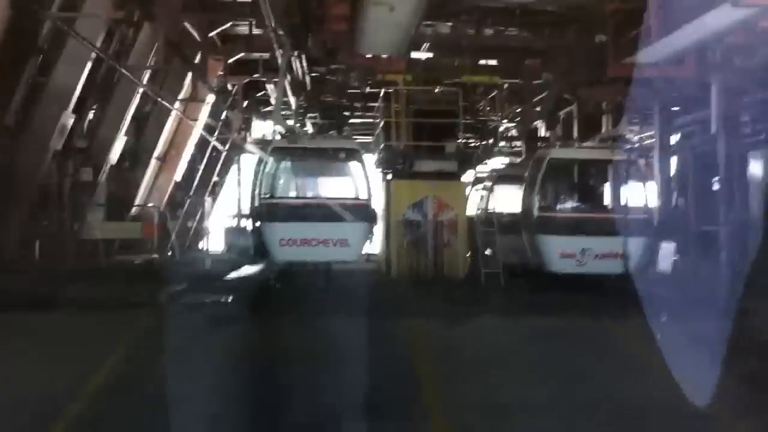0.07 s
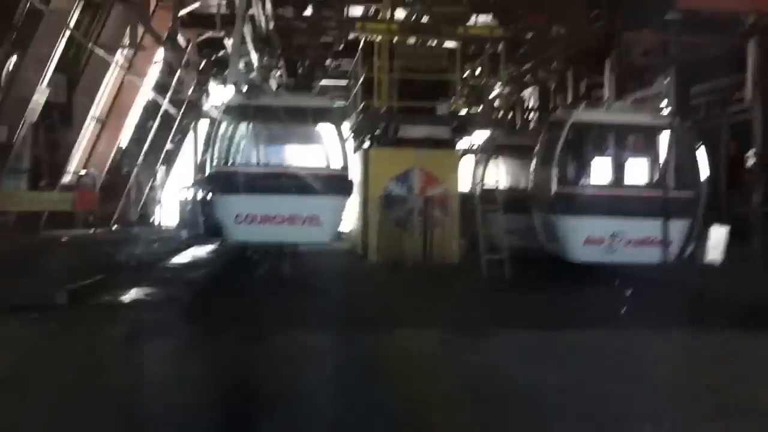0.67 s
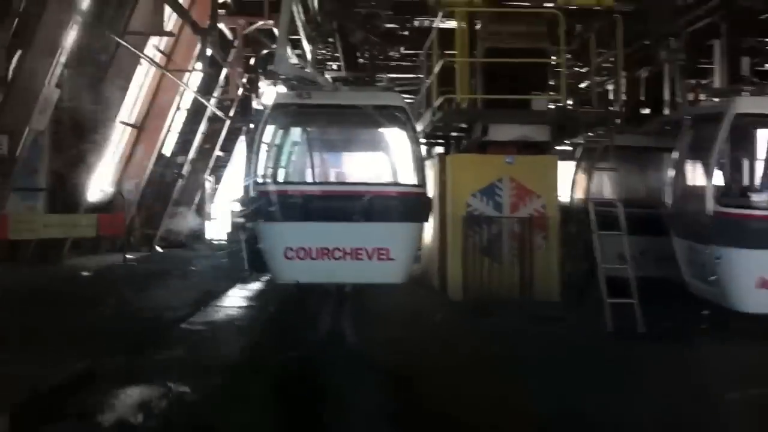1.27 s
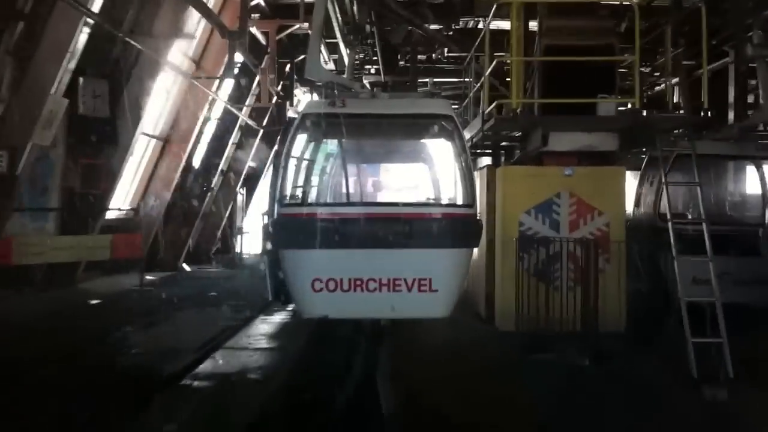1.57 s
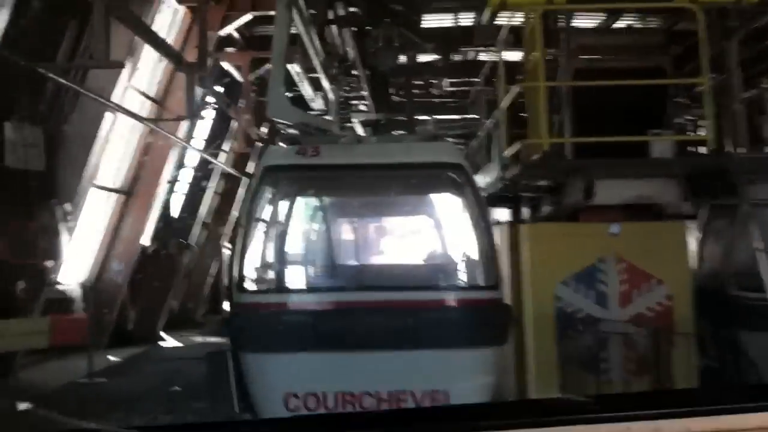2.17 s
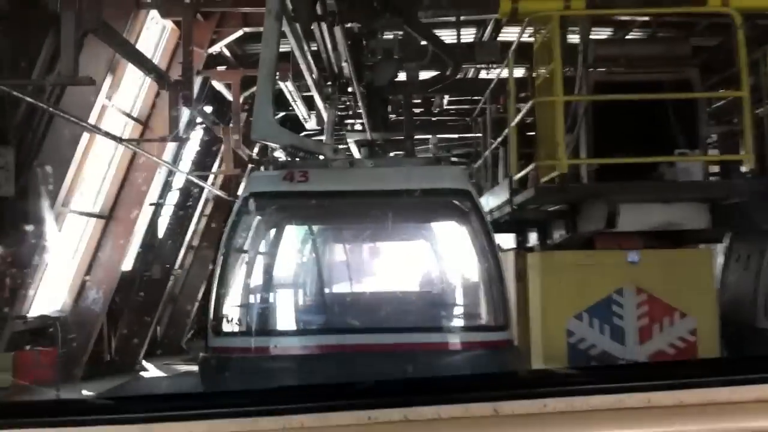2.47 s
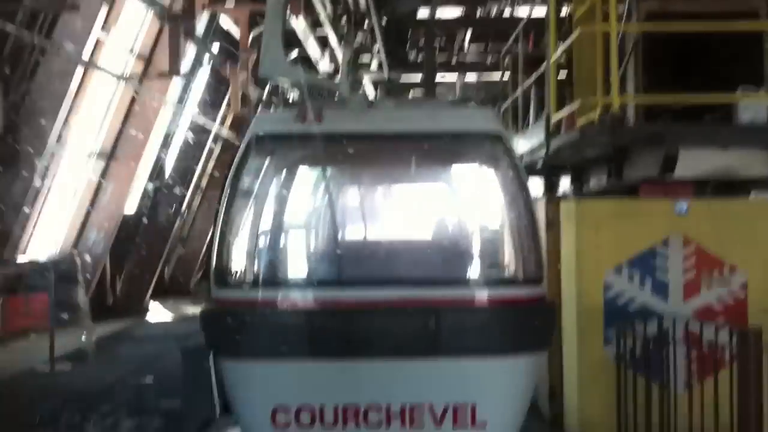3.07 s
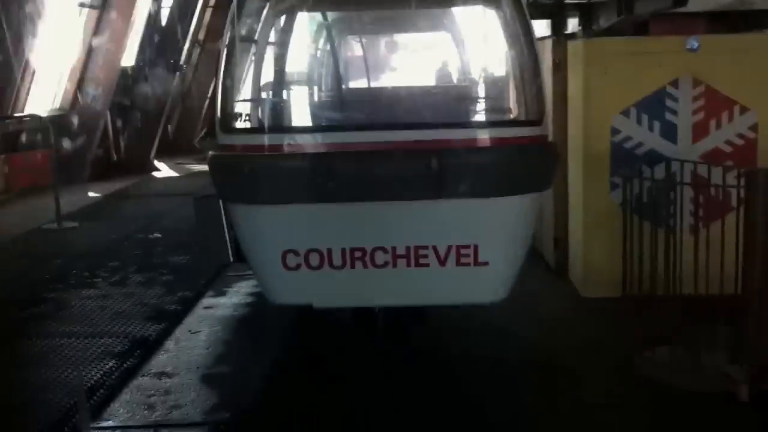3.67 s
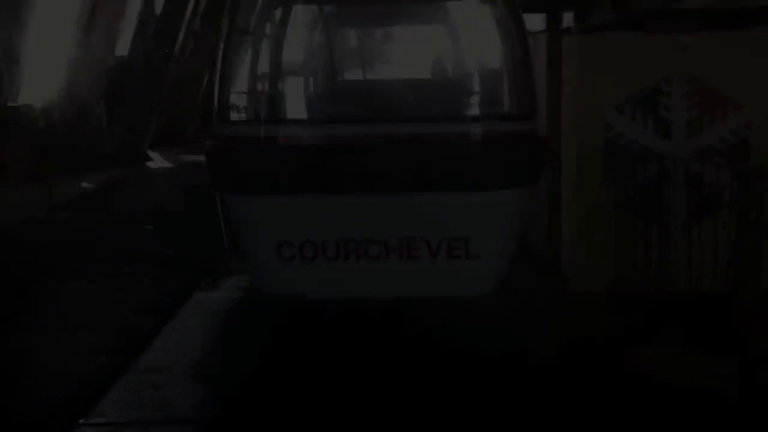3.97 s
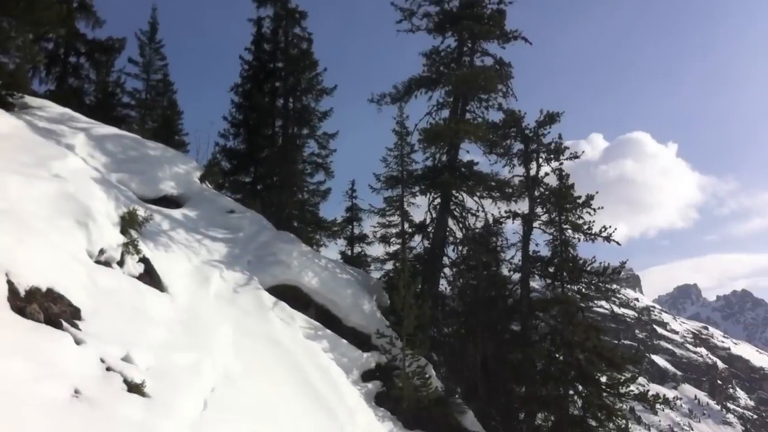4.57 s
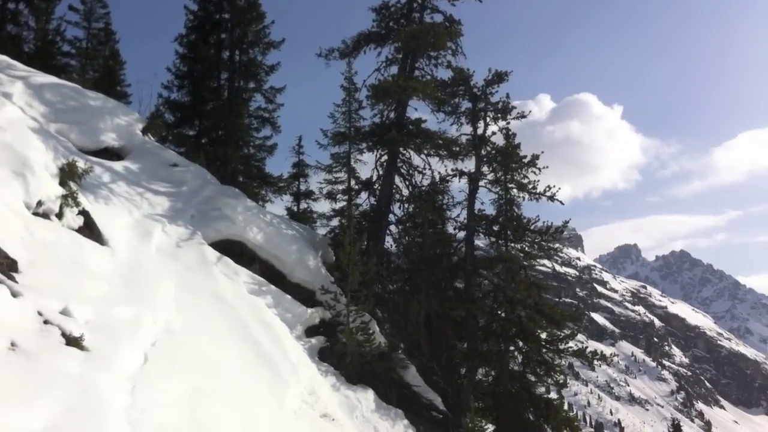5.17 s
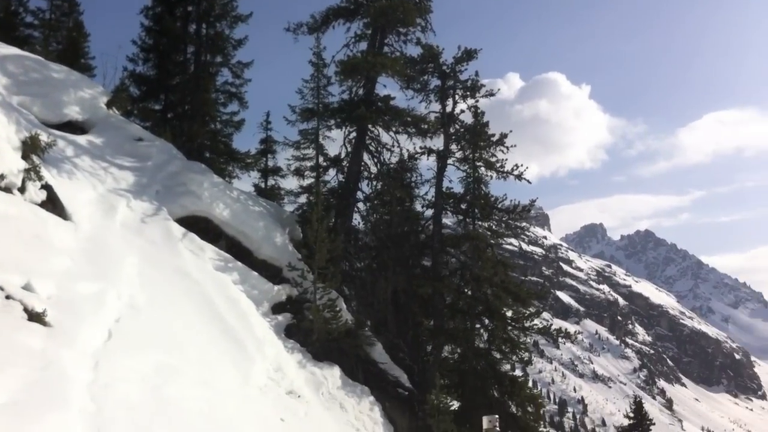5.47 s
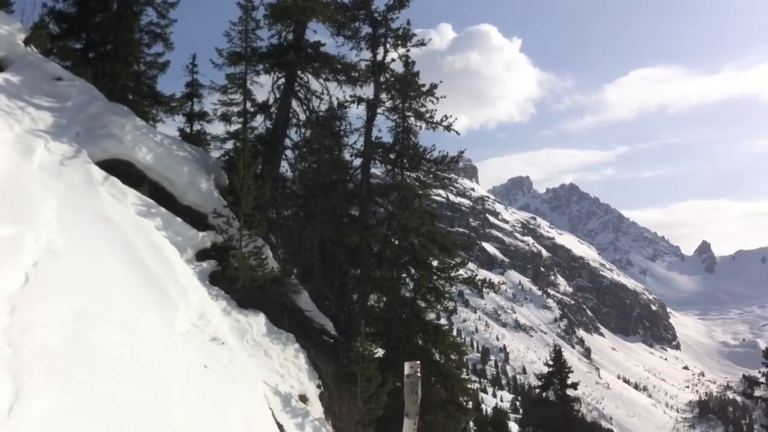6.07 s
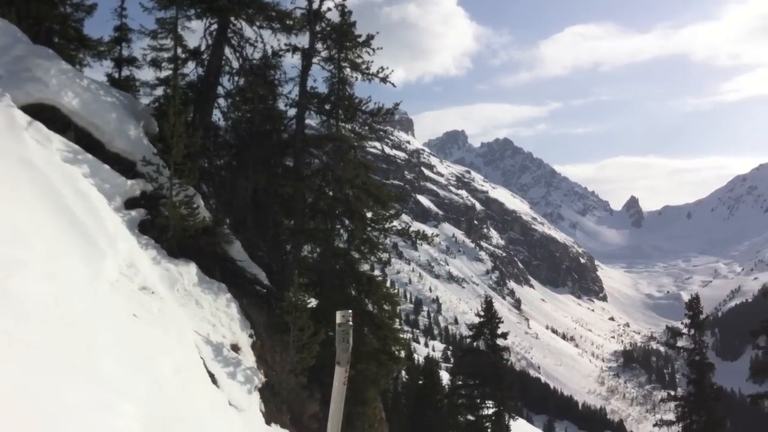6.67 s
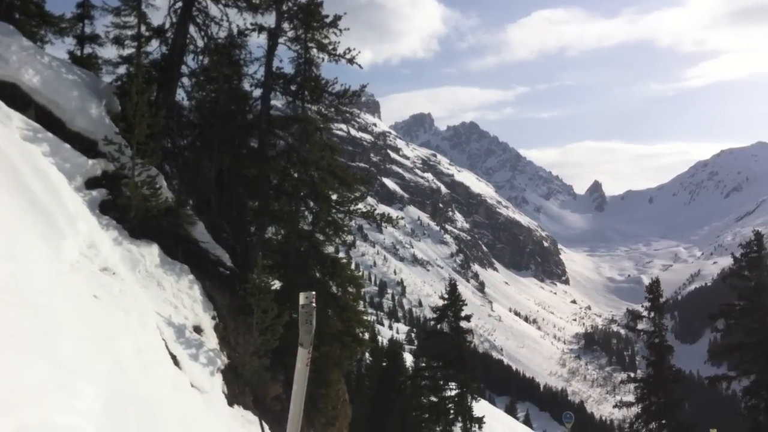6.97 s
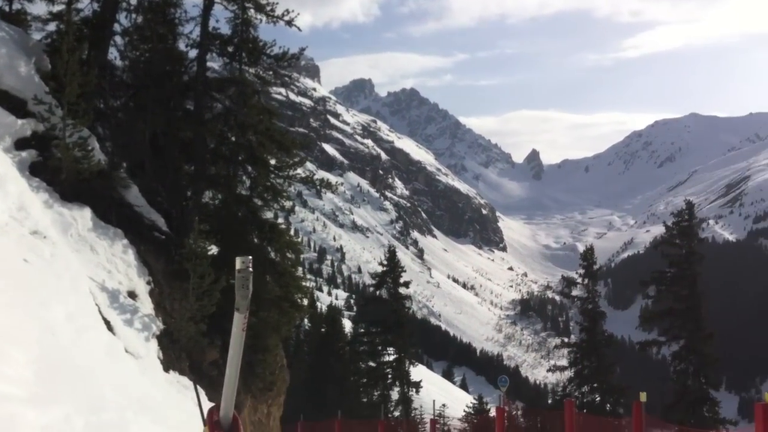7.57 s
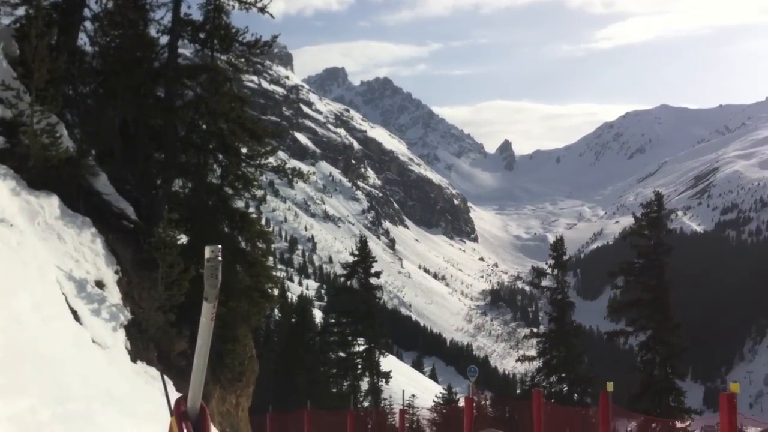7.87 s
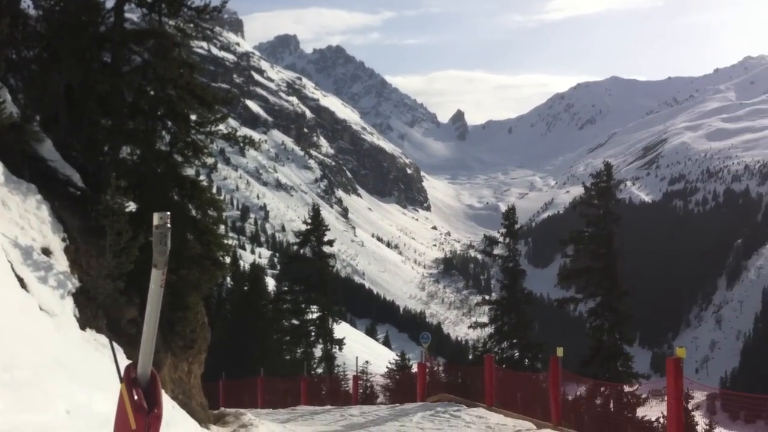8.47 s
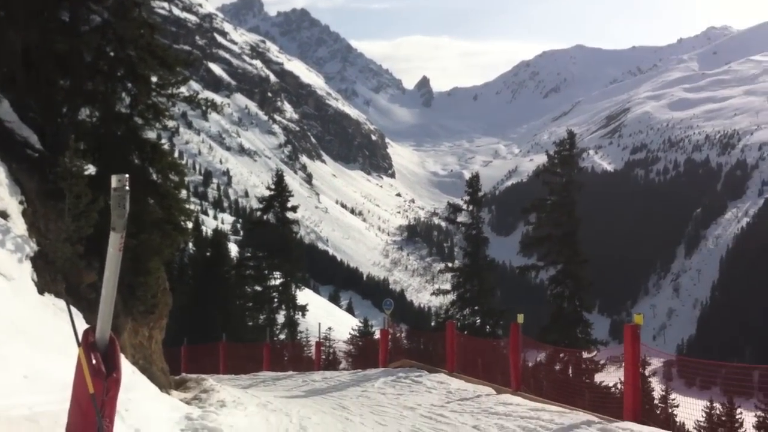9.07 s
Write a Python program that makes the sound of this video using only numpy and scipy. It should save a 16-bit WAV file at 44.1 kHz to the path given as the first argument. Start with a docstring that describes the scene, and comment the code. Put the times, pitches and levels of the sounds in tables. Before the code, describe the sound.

Cable car cabins roll through a station hall with a deep rumble, booming tyre bumps, rattles and ringing steel clanks over a machine hum. The sound cuts out briefly near the start and pops back in. The rolling eases, a few lighter clanks and scrapes follow, and the station fades away. A much quieter snowy slope fades in, where two small birds whistle and dry ticks snap close by over soft wind and a distant lift hum.

```python
"""Booms and steel clanks fill a gondola station as cabins roll along the rail: tyres bump, the steel
rings, loose parts rattle and the drive hums underneath. Near the start the sound cuts out briefly
and pops back in. The station then fades away and a quiet snowy slope fades in: two small birds
whistle slurred notes, and dry ticks snap close by, over soft wind and the far hum of the lift."""
import sys
import numpy as np
from scipy import signal
from scipy.fft import rfft, irfft
from scipy.io import wavfile
from scipy.ndimage import uniform_filter1d

SR = 44100
rng = np.random.default_rng(int(sys.argv[2]) if len(sys.argv) > 2 else 0)


def log_audio(samples):
    """Write samples as a 16-bit WAV file to the path given in sys.argv[1]."""
    # one column per channel
    frames = np.atleast_2d(samples).T
    # limit to full scale, then quantise
    limited = np.clip(frames, -1, 1)
    pcm = np.round(limited * 32767).astype(np.int16)
    wavfile.write(sys.argv[1], SR, pcm)


N = 410571
TIME, BINS = np.arange(N) / SR, np.fft.rfftfreq(8192, 1 / SR)
OCTAVES = np.log2(np.clip(BINS, 200, 9000) / 1000)  # tilts the tone around 1 kHz


# How hard the wheels roll, driving rumble and rattle. Each row: time in seconds, level in dB.
ROLL_LEVEL = [(0, -27), (.04, -18.5), (.32, -27), (.57, -19), (.78, -27.5), (.88, -20.5), (1.15, -20),
              (1.42, -37), (2.0, -46), (2.9, -42), (3.05, -30), (3.7, -37), (3.85, -46)]
# Tone of the rumble. Each row: frequency in Hz, relative level in dB.
RUMBLE_EQ = [(25, -36.5), (55, -20), (100, -11.5), (160, -2.5), (260, -5.5), (420, -8), (600, -22),
             (1500, -48.5), (6000, -84.5)]
# Resonances of the hall and its frame. Each row: frequency in Hz, width in Hz, boost in dB.
FRAME_MODES = [(73, 12, 8.5), (132, 22, 6), (148, 16, 3), (204, 11, 12.5), (244, 16, 9), (299, 14, 3.5),
               (330, 22, 8.5), (378, 16, 2.5), (416, 16, 4)]
# The hardest wheel bumps. Each row: start in seconds, relative level in dB.
WHEEL_BUMPS = [(.505, -18), (.716, -20), (.886, -10.5), (1.096, -17), (1.237, -14.5), (1.339, -13),
               (1.382, -15), (1.485, -16), (1.672, -19), (1.772, -22), (2.205, -26.5), (2.598, -23.5),
               (2.668, -27.5), (3.217, -26), (3.438, -26)]
# What a bump rings. Each row: pitch in Hz, relative level in dB, seconds to fall 60 dB.
BOOM_MODES = [(205.4, 1.5, 0.2), (242, -3, 0.17), (131, -17.5, 0.045)]
# Dull thuds of swaying cabins. Each row: start in seconds, level in dB, pitch in Hz.
CABIN_THUDS = [(.023, -14, 172), (.386, -19, 136.5), (.852, -10.5, 143), (2.2, -20, 124), (3.085, -20, 118)]

def wheels(rumble_db=-3.0, bump_db=2, contact_s=.011, thud_t60=0.18):
    """Rolling wheels shake the frame; each bump of a soft tyre swells into a boom, and cabins thud."""
    out = noise(eq(RUMBLE_EQ) + boosts(FRAME_MODES)) * amp(curve(ROLL_LEVEL) + rumble_db)
    t = TIME[:SR // 2]
    push = 1 - np.exp(-(t / contact_s) ** 2)
    boom = push * sum(amp(db - 60 * t / t60) * np.sin(2 * np.pi * hz * (t - contact_s))
                      for hz, db, t60 in BOOM_MODES)
    for start, db in WHEEL_BUMPS + judder():
        add(out, start, amp(db + bump_db) * boom)
    for start, db, hz in CABIN_THUDS:
        add(out, start, push * amp(db - 60 * t / thud_t60) * np.sin(2 * np.pi * hz * t))
    return out


def judder(span_s=(.38, 1.9), per_s=21, jitter_s=.008, peak_s=1.5, peak_db=-23):
    """A cabin crosses the row of tyres in light bumps. Each row: start in seconds, level in dB."""
    starts = np.arange(*span_s, 1 / per_s)
    starts += jitter_s * rng.standard_normal(len(starts))
    past_peak = starts - peak_s
    levels = peak_db + np.minimum(7 * past_peak, -19 * past_peak)  # build and fade, dB a second
    return list(zip(starts, levels))


# Steel clanks; the one at .226 s is a dull knock as the sound pops back in. Each row: start in seconds,
# level in dB, attack in seconds, seconds to fall 60 dB, brightness in dB per octave.
STEEL_CLANKS = [(0, -18, .016, .5, -.3), (.064, -16.5, .005, .7, 0), (.226, -24.5, .002, .36, -3.2),
                (.358, -20.5, .026, .28, -1.3), (.459, -23.8, .003, .7, 1.8), (.538, -13.5, .009, .32, -.8),
                (.636, -15.5, .004, .21, 0), (1.002, -20, .006, .55, -.5), (1.113, -17.5, .006, .26, -.2),
                (1.447, -22.5, .009, .27, -2.7), (2.075, -39, .013, .9, 2), (2.594, -33, .004, .6, -.6),
                (2.858, -31.8, .013, .22, -2.3), (3.005, -28, .013, .3, -6), (3.254, -34, .0035, .29, 4.5),
                (3.338, -30, .021, .33, 0), (3.376, -24.5, .022, .25, -2), (3.42, -28, .014, .24, -6),
                (3.675, -34, .01, .3, 0)]
# Tone of struck steel. Each row: frequency in Hz, relative level in dB.
STEEL_EQ = [(40, -25), (130, -8), (300, -2), (550, -3), (1000, -5), (2100, -8), (3100, -14), (4800, -13.5),
            (6500, -21), (10000, -29), (15800, -38.5)]
# Resonances of the rail and grips. Each row: frequency in Hz, width in Hz, boost in dB.
STEEL_MODES = [(330, 30, 4), (462, 30, 6), (545, 30, 3), (615, 36, 7), (891, 22, 11), (1120, 30, 3),
               (1410, 60, 7.5), (1945, 60, 5), (2187, 30, 5), (2489, 26, 9), (3915, 80, 4), (4600, 50, 5),
               (4720, 100, 4), (5090, 60, 5)]

def clanks(grain_db=1.7, hall_db=-17, hall_t60=0.48, hall_tilt_db=-4.0):
    """Each clank is a dense clatter of contacts ringing the steel, with a duller tail from the hall."""
    out, t = np.zeros(N), TIME[:SR]
    steel = eq(STEEL_EQ) + boosts(STEEL_MODES)
    for start, db, rise, t60, bright_db in STEEL_CLANKS:
        contacts, grain, echoes, spot = rng.standard_normal((4, len(t)))
        clatter = unit(contacts * amp(grain_db * unit(uniform_filter1d(grain, size=60))))
        attack, after = np.minimum(t / rise, 1), np.maximum(t - rise, 0)
        # every spot on the rail favours its own mix of modes
        spot_db = 2.3 * unit(uniform_filter1d(spot[:len(BINS)], size=7)) * np.clip(OCTAVES + 3, 0, 1)
        colour = steel + bright_db * OCTAVES + spot_db
        direct = signal.fftconvolve(clatter * attack * amp(-60 * after / t60), ring(colour))
        tail = echoes * attack * amp(hall_db - 60 * after / hall_t60)
        hall = signal.fftconvolve(tail, ring(colour + hall_tilt_db * OCTAVES))
        add(out, start, amp(db) * (direct + hall))
    return out


def rattle(rattle_db=-23.6, hard_roll_db=-20, growth=1.65, tilt_db=-3.0, grain_db=1.8, shake_db=1.0):
    """Hard rolling shakes loose steel into an uneven rattle that grows faster than the rumble."""
    steel = noise(eq(STEEL_EQ) + .7 * boosts(STEEL_MODES) + tilt_db * OCTAVES)
    shaking = amp(grain_db * drift(200) + shake_db * drift(20))
    level_db = rattle_db + growth * (curve(ROLL_LEVEL) - hard_roll_db)
    return unit(steel * shaking) * amp(level_db)


# Tone of the machinery bed. Each row: frequency in Hz, relative level in dB.
MACHINE_EQ = [(15, -62), (25, -32), (70, -19.5), (113, 0.5), (165, -7.5), (241, 2), (269, -9), (324, -4.5),
              (449, -11.5), (637, -9), (834, -13.5), (1980, -18), (3130, -28.5), (4820, -28), (15800, -54)]
# Fader for that bed. Each row: time in seconds, level in dB.
MACHINE_FADER = [(0, -33.5), (1.5, -33), (2.7, -33.5), (3.05, -35.5), (3.7, -34.5)]
# Faders for the drive's hum. Each row: time in seconds, lower tone in dB, upper tone in dB.
HUM_FADERS = [(0, -50, -44), (1.5, -52, -52), (2.0, -43.5, -50), (2.75, -48, -38), (3.35, -49, -47),
              (3.62, -39, -47), (4.1, -38, -50)]

def machinery(hum_hz=(105, 124), waver=.018, throb_db=2.5, flutter_db=1.0):
    """Belts and tyres churn in the hall over the two wavering tones of the drive."""
    churn = noise(eq(MACHINE_EQ) + .12 * boosts(STEEL_MODES))
    out = churn * amp(curve(MACHINE_FADER) + flutter_db * drift(6))
    for column, hz in enumerate(hum_hz, 1):
        cycles = np.cumsum(hz * (1 + waver * drift(15))) / SR
        tone = unit(np.sin(2 * np.pi * cycles) * amp(throb_db * drift(14)))
        out += tone * amp(curve(HUM_FADERS, column))
    return out


# Roller scrapes. Each row: peak time in seconds, level in dB, half-width in seconds, pitch in Hz.
ROLLER_SCRAPES = [(2.15, -50, .035, 4980), (2.7, -50, .04, 4800), (2.955, -50, .01, 5400),
                  (3.365, -42, .035, 6100), (3.976, -42.5, .036, 3900)]

def squeaks(width_hz=380):
    """A dry roller scrapes for a moment through one resonance."""
    out = np.zeros(N)
    for peak_s, db, half_width, hz in ROLLER_SCRAPES:
        resonance = -20 * np.log10(1 + ((BINS - hz) / width_hz) ** 2)
        out += swells([(peak_s, db, half_width)]) * noise(resonance)
    return out


# Note shapes. Each gives: length in seconds, held pitch in Hz, opening sweep in Hz,
# settling time in seconds, end flick in Hz, attack in seconds, sag in dB.
DIP_NOTE = (.174, 4080, 2000, .017, 2100, .03, 0)
FALL_NOTE = (.152, 3360, 2480, .02, -300, .008, -7)
RISE_NOTE = (.102, 4660, -1200, .03, 800, .036, -1)
SLIDE_NOTE = (.134, 3270, 1950, .046, -300, .014, -5)
# Each bird's calls. Each row: start in seconds, level in dB, second note's delay in seconds, note count.
FIRST_CALLS = [(5.053, -65, .262, 2), (5.59, -60.5, .268, 2), (6.146, -60.5, .282, 2),
               (8.293, -65, .254, 2), (8.845, -60.5, .272, 2)]
SECOND_CALLS = [(6.16, -63, .168, 2), (6.51, -59, .18, 2), (6.895, -58.5, .188, 2), (7.28, -59, .188, 1)]

def birds(fall_db=2, slide_db=-2, flutter_db=1.5, echo_db=-12.5, echo_t60=0.79):
    """Two birds whistle couplets, scattered faintly by the trees."""
    song = np.zeros(N)
    wobble = 1 + .005 * drift(250) + .004 * drift(15)
    flutter = amp(flutter_db * drift(70))
    singers = (FIRST_CALLS, DIP_NOTE, FALL_NOTE, fall_db), (SECOND_CALLS, RISE_NOTE, SLIDE_NOTE, slide_db)
    for calls, first, second, second_db in singers:
        for start, db, delay, count in calls:
            add(song, start, whistle(start, db, first, wobble))
            if count > 1:
                add(song, start + delay, whistle(start + delay, db + second_db, second, wobble))
    t = TIME[:SR // 2]
    scatter = rng.standard_normal(len(t)) * amp(-60 * t / echo_t60)
    echo = signal.oaconvolve(song, scatter / np.linalg.norm(scatter))[:N]
    return song * flutter + amp(echo_db) * echo


def whistle(start, db, note, wobble, crest_s=.008, flick_s=.015, release_s=.007, detune=.005):
    """A note sweeps to its held pitch and flicks away; reflections off branches beat against it."""
    length, held_hz, sweep_hz, settle, flick_hz, attack, sag_db = note
    t = np.arange(0, length, 1 / SR)
    sweep = sweep_hz / (1 + abs(t - crest_s) / settle) ** 2
    flick = flick_hz / (1 + (length - t) / flick_s) ** 2
    tuning = wobble[round(start * SR):][:len(t)] + detune * rng.standard_normal()
    cycles = np.cumsum((held_hz + sweep + flick) * tuning) / SR
    envelope = np.minimum(t / attack, 1) * np.minimum((length - t) / release_s, 1)
    tone = envelope * amp(db + sag_db * t / length) * unit(np.sin(2 * np.pi * cycles))
    branches = rng.standard_normal(SR // 10) * np.exp(-TIME[:SR // 10] / .014)
    paths = np.r_[1, .35 * branches / np.linalg.norm(branches)]
    return signal.fftconvolve(tone, paths)


# The loudest ticks. Each row: start in seconds, peak in dB, centre frequency in Hz.
DRY_TICKS = [(5.8039, -34, 9100), (6.3339, -44, 5300), (6.7995, -41, 7800), (6.8285, -33, 4900),
             (7.1514, -39, 5100), (7.2124, -38, 6200), (7.651, -30, 6200), (7.7024, -35, 5800),
             (8.0724, -34, 8700), (8.1641, -37, 5100), (8.4659, -41, 4200), (8.6382, -43, 4000)]
# Soft rustles. Each row: peak time in seconds, level in dB, half-width in seconds.
RUSTLE_SWELLS = [(6.34, -67, .03), (6.78, -66.5, .09), (7.625, -63, .018), (8.09, -67, .04), (8.8, -73, .2)]
# Their crisp tone. Each row: frequency in Hz, relative level in dB.
RUSTLE_EQ = [(200, -28), (1200, -3), (4500, 6), (8000, 1), (15800, -8.5)]

def ticks_and_rustles(grains_per_s=1100, spread_db=4.5, crackle_db=-80, faint_span_s=(6.3, 9.0)):
    """Tiny dry snaps with a millisecond of chatter, among rustles made of far smaller ones."""
    sizes = amp(spread_db * np.minimum(rng.exponential(1, N), 4)) * rng.choice([-1, 1], N)
    grains = sizes * (rng.random(N) < grains_per_s / SR)
    crackle = unit(signal.oaconvolve(grains, ring(eq(RUSTLE_EQ)))[:N])
    out = (swells(RUSTLE_SWELLS) + amp(crackle_db)) * crackle
    faint_ticks = [(rng.uniform(*faint_span_s), rng.normal(-49, 2), 5400) for _ in range(8)]
    t = TIME[:SR // 50]
    for start, db, hz in DRY_TICKS + faint_ticks:
        snap = (t == 0) + amp(-15 - 60 * t / .005) * rng.standard_normal(len(t))
        bandpass = -10 * np.log10(1 + (BINS / hz / 1.4) ** 4 + (hz / (BINS + 1) / 2.5) ** 2.5)
        tick = signal.fftconvolve(snap, ring(bandpass))
        add(out, start, amp(db) * tick / abs(tick).max())
    return out


# Tones of open air, wind in far trees and close gusts. Each row: frequency in Hz, relative level in dB.
AIR_EQ = [(25, -13), (49, -21), (144, 0), (392, -3.5), (500, -13), (587, -9), (654, -9.5), (1510, -16.5),
          (2200, -18.5), (5820, -19), (15800, -25)]
TREES_EQ = [(60, -32), (200, -8.5), (300, -1), (410, -2.5), (600, -15), (1200, -27.5), (4000, -49.5)]
GUST_EQ = [(25, -17), (60, -27), (100, -2), (160, -1), (250, -9), (400, -21), (1500, -54)]
# Fader for the trees. Each row: time in seconds, level in dB.
TREES_FADER = [(4.3, -65), (5.3, -66), (5.7, -73), (9.3, -78)]
# Light gusts. Each row: peak time in seconds, level in dB, half-width in seconds.
GUST_SWELLS = [(5.88, -62, .022), (6.65, -62, .07), (7.07, -69, .03), (7.5, -67, .03), (7.86, -63.5, .045),
               (8.88, -56, .038), (8.99, -57, .06), (9.3, -59.5, .07)]

def wind(air_db=-66.0):
    """Over a bed of still air, wind rushes through far trees and low gusts puff close by."""
    air = amp(air_db + .5 * drift(4)) * noise(eq(AIR_EQ))
    trees = amp(curve(TREES_FADER)) * noise(eq(TREES_EQ))
    gusts = swells(GUST_SWELLS) * noise(eq(GUST_EQ))
    return air + trees + gusts


# The lift heard from the slope. Each row: pitch in Hz, level in dB.
LIFT_TONES = [(153, -77), (425, -83.5), (568, -86)]

def far_lift(waver=0.0043, throb_db=3.42):
    """The distant lift hums: its tones waver in pitch together and swell separately."""
    clock = np.cumsum(1 + waver * drift(11)) / SR
    return sum(amp(db) * unit(np.sin(2 * np.pi * hz * clock) * amp(throb_db * drift(2.4)))
               for hz, db in LIFT_TONES)


def amp(db):
    """Decibels to gain."""
    return np.exp(np.asarray(db) * (np.log(10) / 20))


def unit(x):
    """Scales to rms 1."""
    return x / np.sqrt(np.mean(x ** 2) + 1e-20)


def curve(rows, column=1):
    """One column of a time table at every sample."""
    rows = np.array(rows)
    return np.interp(TIME, rows[:, 0], rows[:, column])


def eq(points):
    """A spectrum in dB, joined on a log-frequency axis."""
    hz, db = np.transpose(points)
    return np.interp(np.log(BINS + 1), np.log(hz + 1), db)


def boosts(modes):
    """The dB that a set of resonances adds to a spectrum."""
    return sum(db / (1 + (2 * (BINS - hz) / width) ** 2) for hz, width, db in modes)


def ring(db):
    """Minimum-phase impulse response of energy 1 with this spectrum."""
    log_gain = np.log(amp(np.maximum(db - db.max(), -100)))
    mirrored = np.r_[log_gain, log_gain[-2:0:-1]]
    taps = np.fft.ifft(np.exp(np.conj(signal.hilbert(mirrored)))).real[:len(BINS)]
    return taps / np.linalg.norm(taps)


def noise(db):
    """Steady noise of rms 1 with this spectrum."""
    return unit(signal.oaconvolve(rng.standard_normal(N + len(BINS) - 1), ring(db), "valid"))


def drift(per_s):
    """Smooth random modulation of rms 1, rolling off above per_s Hz."""
    hz = np.fft.rfftfreq(N, 1 / SR)[:N // 100]
    slow = irfft(rfft(rng.standard_normal(2 * len(hz) - 2)) * np.exp(-(hz / per_s) ** 2))
    return unit(np.interp(TIME, np.linspace(0, TIME[-1], len(slow)), slow))


def swells(rows):
    """Gain made of bell-shaped swells."""
    return sum(amp(db) / (1 + ((TIME - peak_s) / half_width) ** 2 / 2) ** 2
               for peak_s, db, half_width in rows)


def add(mix, start, sound):
    """Mixes a sound in at its start in seconds."""
    part = mix[max(round(start * SR), 0):][:len(sound)]
    part += sound[:len(part)]


def scene(fade_out_s=(3.6, 4.128), fade_in_s=(4.206, 4.72)):
    """The station fades out, then the slope fades in, in mono."""
    station = machinery() + wheels() + rattle() + clanks() + squeaks()
    slope = wind() + far_lift() + birds() + ticks_and_rustles()
    return (station * np.interp(TIME, fade_out_s, [1, 0]) + slope * np.interp(TIME, fade_in_s, [0, 1]))[None]


def record(dry, cut_s=.0885, resume_s=.2275, pop_db=-10, pop_s=0.00037, cutoff_hz=15850):
    """A brief silence ends in a pop, and a low-pass trims the highest treble."""
    live = (TIME < cut_s) | (TIME > resume_s)
    pop = amp(pop_db) * (TIME > resume_s) * np.exp(-abs(TIME - resume_s) / pop_s)
    lowpass = signal.firwin(511, cutoff_hz, window=("kaiser", 9), fs=SR)
    return signal.oaconvolve(dry * live + pop, lowpass[None], "same")


dry = scene()
out = record(dry)
log_audio(out)
```